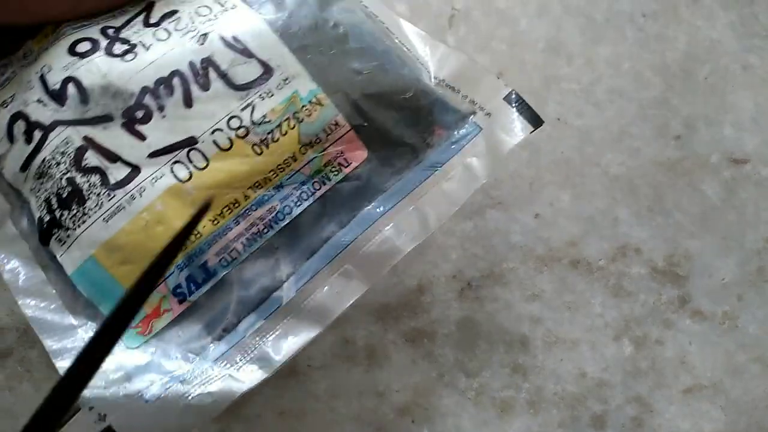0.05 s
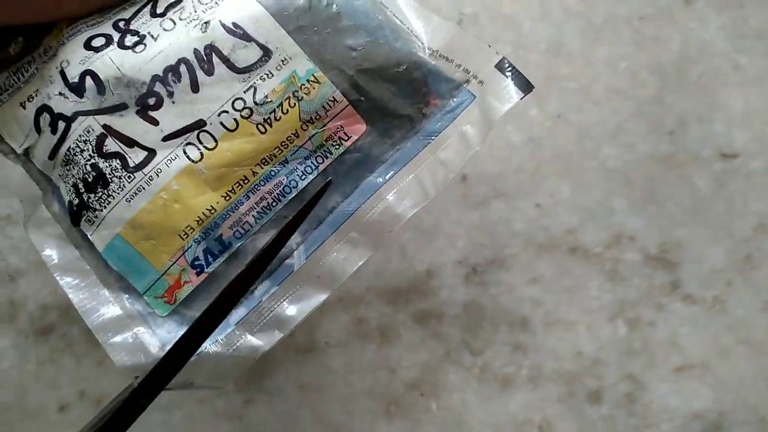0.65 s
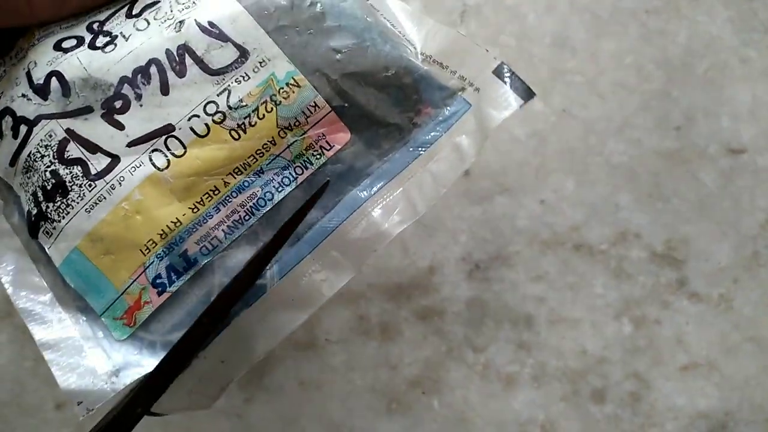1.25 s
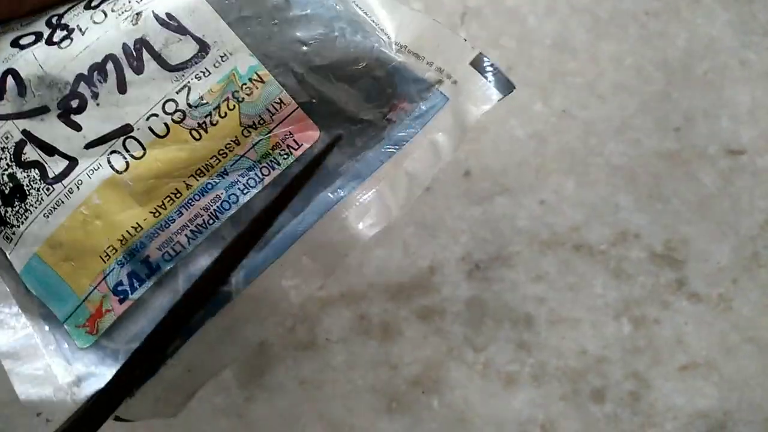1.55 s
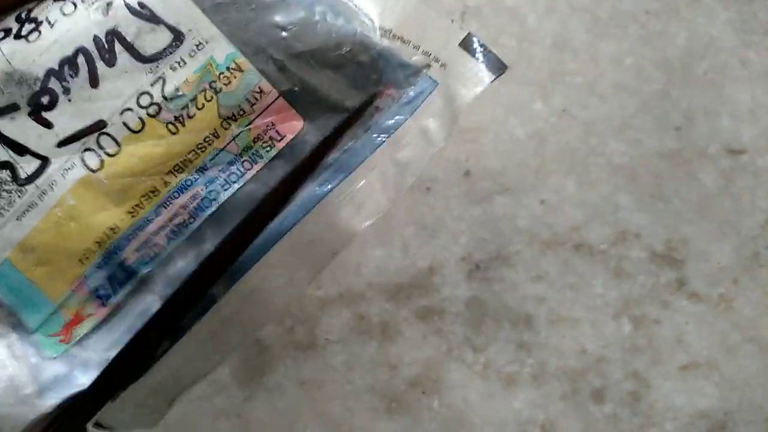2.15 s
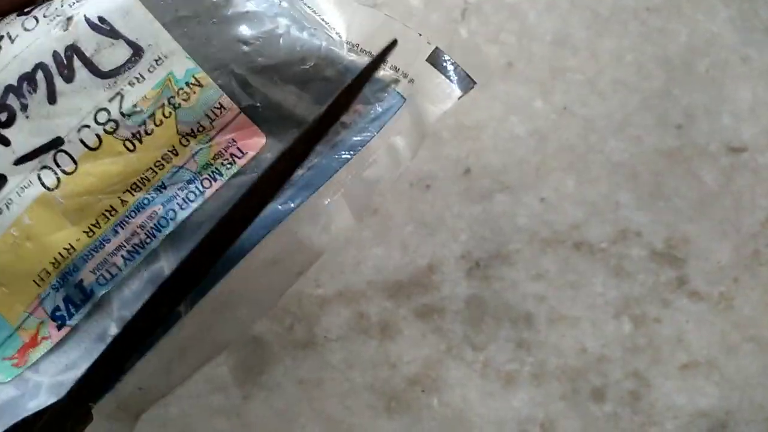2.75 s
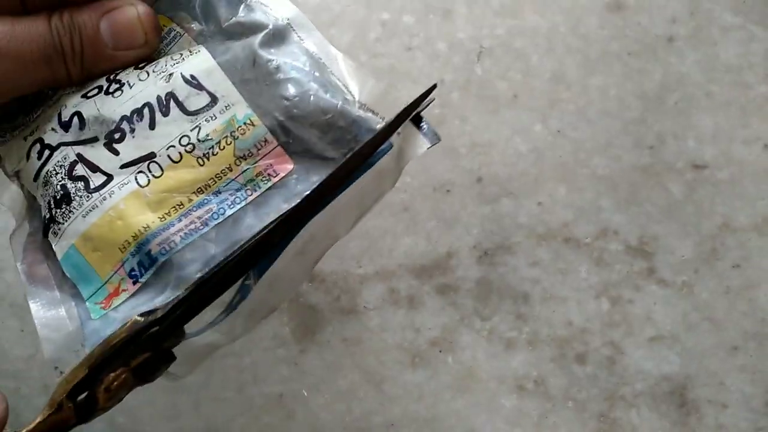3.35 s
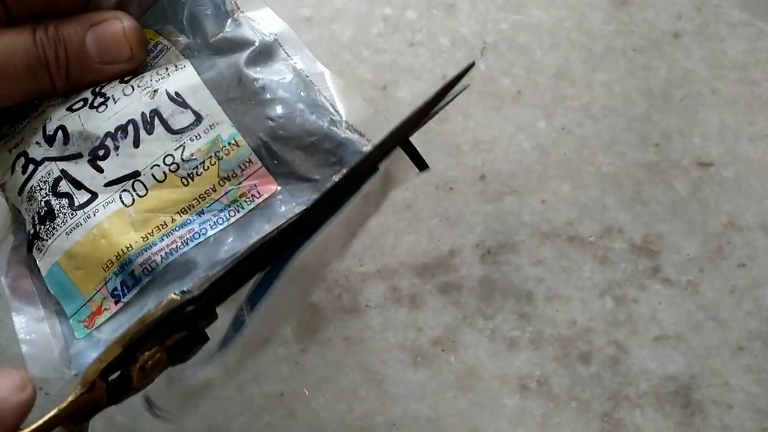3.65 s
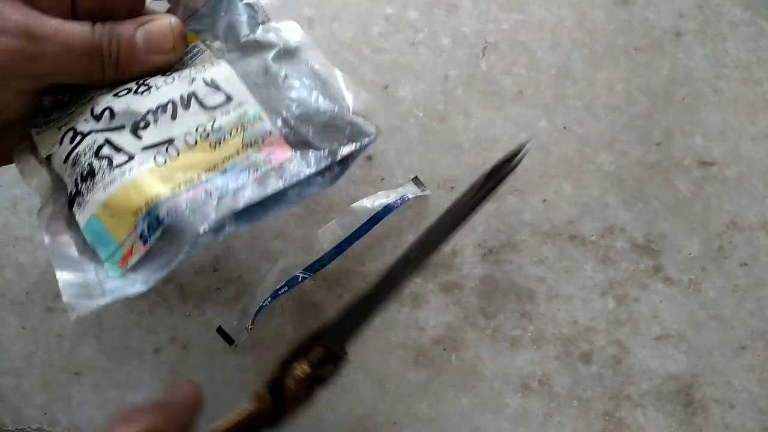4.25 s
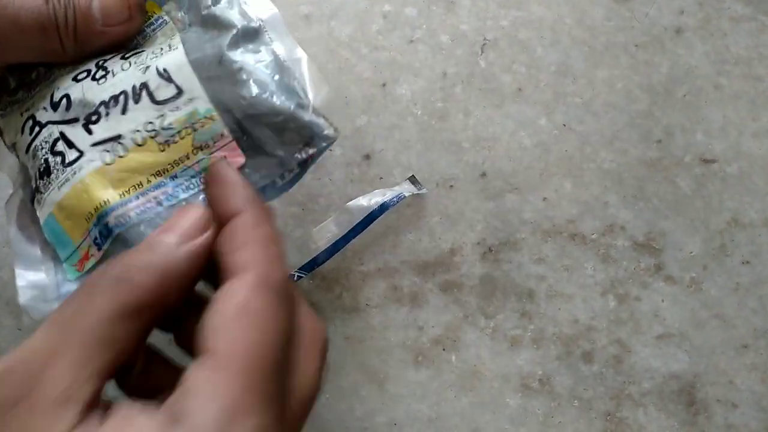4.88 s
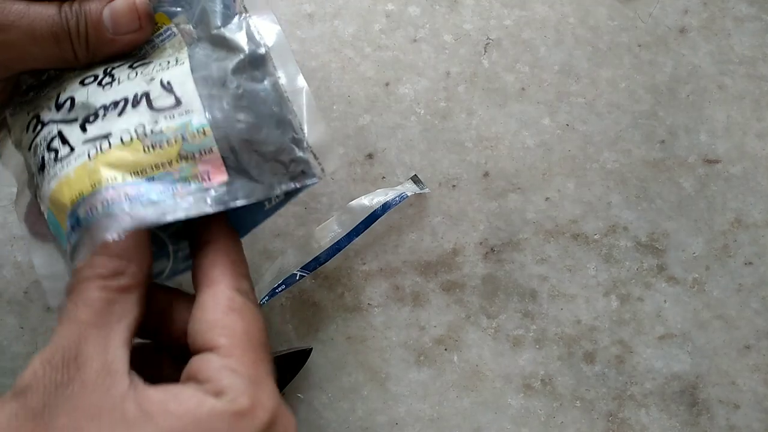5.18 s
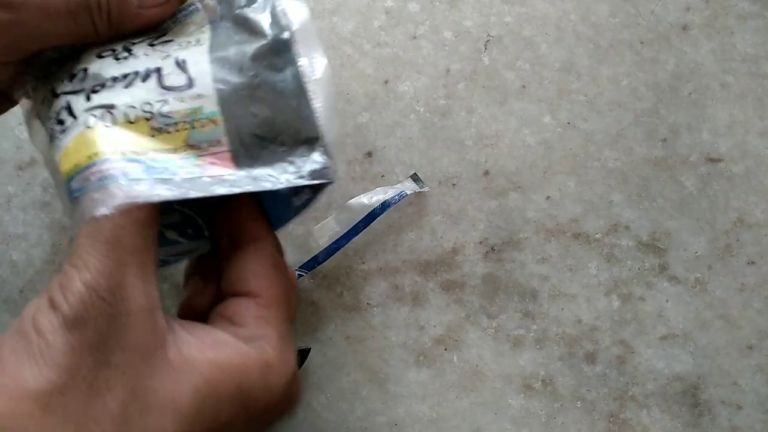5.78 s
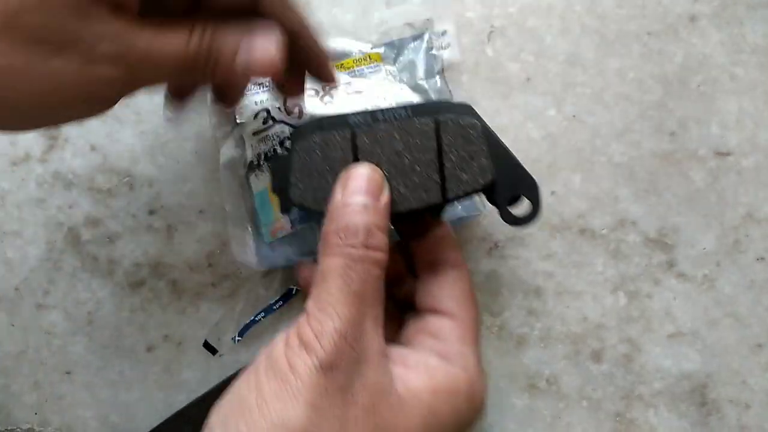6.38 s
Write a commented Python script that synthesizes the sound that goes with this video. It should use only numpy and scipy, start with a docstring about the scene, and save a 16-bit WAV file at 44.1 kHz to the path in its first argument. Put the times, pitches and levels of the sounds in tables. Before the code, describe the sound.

Close by in a small hard room, a stiff plastic packet snaps and crinkles as scissor blades tick against it and shear through in short, raspy strokes. The scissors shut with a click, tap a stone floor, scrape briefly and fall flat with a bright metallic ring. Fingers then dig into the packet and pull out the contents with denser, louder crackling. A faint low rumble lies underneath.

```python
"""Stiff plastic snaps and rustles as scissors cut a packet open, close by.
Creases buckle and crack; the blades tick on the film, shear it in runs of tiny tears, then shut.
The scissors touch a stone floor, scrape along it and fall flat, ringing.
Fingers pull the contents from the crackling packet. A small hard room answers over a low rumble."""
import sys
import numpy as np
from scipy import signal
from scipy.fft import rfft, irfft, next_fast_len
from scipy.io import wavfile
from scipy.ndimage import uniform_filter1d, map_coordinates

SR = 44100
rng = np.random.default_rng(int(sys.argv[2]) if len(sys.argv) > 2 else 0)


def materialize(psi):
    """Save the field psi as 16-bit PCM at rate SR to the path in sys.argv[1].

    A 1-D psi becomes a single channel; in a 2-D psi each row is a channel.
    """
    bounded = np.clip(np.atleast_2d(psi).T, -1, 1)
    quanta = np.round(bounded * 32767).astype(np.int16)
    wavfile.write(sys.argv[1], SR, quanta)


N = 283122
T = np.arange(N) / SR

# spectrum of a buckling crease: freq_hz, gain_db
CREASE_SPECTRUM = [(100, -21.5), (300, -6.5), (550, -6.5), (1000, 1), (1600, -1.5), (2500, -4), (4000, 1.5),
                   (5500, 2), (7500, -4), (10000, -4.5), (14000, -21.5)]
# film sliding under the scissors: time_s, crinkle_db, rub_db
CUTTING_LEVELS = [(0.0, -66.5, -77), (0.14, -66, -60), (0.29, -71.5, -67), (0.52, -78, -67.5),
                  (0.69, -78.5, -97), (1.15, -78, -82), (1.33, -73, -68), (1.55, -67, -75),
                  (1.68, -59, -63), (1.89, -67.5, -69), (2.39, -73, -70.5), (2.5, -65, -67),
                  (2.62, -76, -91), (2.8, -97, -95), (3.04, -69.5, -89.5), (3.48, -71.5, -68),
                  (3.94, -65, -81), (4.35, -72, -70)]
# blades against the film: freq_hz, width_hz, gain_db
BLADE_MODES = [(1100, 120, 15), (2350, 12, 5), (2800, 40, -9), (3460, 210, 6), (5600, 520, 10.5),
               (6370, 200, -9.5), (8260, 220, -30.5), (10130, 560, 0.5), (12500, 300, -22)]
# undamped scissors: freq_hz, width_hz, gain_db
FREE_STEEL_MODES = [(2700, 130, -14.5), (5350, 140, -4.5), (5730, 230, -9.5), (6090, 110, -1.5),
                    (6460, 200, -18), (7700, 120, -17), (8000, 180, -2), (8630, 73, -9), (9070, 140, -5.5),
                    (9920, 120, -3), (10400, 75, -12), (11900, 91, -9.5), (12420, 130, -14),
                    (13000, 200, -13)]


def amp(db):
    """Decibels to gain."""
    return 10 ** (np.asarray(db) / 20)


def unit(x):
    """Scale to rms 1."""
    return x / np.sqrt(np.mean(np.abs(x) ** 2) + 1e-20)


def along(points, hz):
    """Interpolate (freq_hz, value) points on a log axis."""
    freq_hz, values = np.transpose(points)
    return np.interp(np.log(hz + 1), np.log(freq_hz + 1), values)


def curves(rows):
    """One per-sample curve for each column after time_s."""
    time_s, *columns = np.transpose(rows)
    return [np.interp(T, time_s, column) for column in columns]


def wobble(rate_hz, size=N):
    """Smooth random curve with knots at rate_hz."""
    knots = rng.standard_normal(int(size * rate_hz / SR) + 4)
    return map_coordinates(knots, [np.arange(size) * rate_hz / SR])


def filtered(x, response):
    """Apply a complex frequency response."""
    n = x.shape[-1]
    padded = 2 * next_fast_len(n // 2 + 2048)
    return irfft(rfft(x, padded) * response(np.fft.rfftfreq(padded, 1 / SR)), padded)[..., :n]


def causal(db):
    """Minimum-phase response with these gains: no pre-ringing."""
    cepstrum = irfft(db * np.log(10) / 20)
    half = len(cepstrum) // 2
    cepstrum[1:half] *= 2
    cepstrum[half + 1:] = 0
    return np.exp(rfft(cepstrum))


def resonances(modes, hz):
    """Summed response of modes of alternating sign."""
    return sum((-1) ** k * amp(db) * 1j * hz * width_hz / (mode_hz ** 2 - hz ** 2 + 1j * hz * width_hz)
               for k, (mode_hz, width_hz, db) in enumerate(modes))


def stereo_noise(size=N):
    """White noise, alike left and right in the bass, mostly unrelated in the treble."""
    # freq_hz, correlation
    likeness = [(60, 0.99), (130, 0.97), (290, 0.93), (640, 0.71), (1400, -0.37), (3000, -0.3),
                (14000, -0.17)]

    def mid_side_gains(hz):
        angle = np.arccos(np.clip(along(likeness, hz), -1, 1)) / 2
        return np.array([np.cos(angle), np.sin(angle)])
    mid, side = filtered(rng.standard_normal((2, size)), mid_side_gains)
    return np.array([mid + side, mid - side])


def grains(rate_hz, spread_db, life_s, bed):
    """Envelope of tiny uneven slips over a smooth friction bed."""
    strength = amp(spread_db * np.minimum(rng.exponential(size=N), 2.5))
    slips = (rng.random(N) < rate_hz / SR) * strength
    decaying = signal.lfilter([1], [1, -np.exp(-1 / (life_s * SR))], slips)
    return unit(unit(decaying) + bed)


def add(track, sound, start_s, level_db):
    """Mix in a sound with the energy of 10 ms at level_db."""
    start = round(start_s * SR)
    part = sound[:, max(-start, 0):N - start]
    energy = np.sum(sound ** 2) / 2 / (.01 * SR)
    track[:, max(start, 0):][:, :part.shape[1]] += amp(level_db) * part / np.sqrt(energy)


def rumble(level_db, swell_db):
    """Low noise from outside, gently swelling."""
    # freq_hz, gain_db
    spectrum = [(20, -14), (40, -12), (60, -6), (88, 2.5), (105, 3.5), (135, -4.5), (230, -6), (330, -9),
                (430, -17.5), (600, -42.5), (1500, -46.5), (5500, -34.5), (8000, -51.5), (14000, -68)]
    swell = amp(level_db + swell_db * wobble(rate_hz=3.5))
    return swell * unit(filtered(stereo_noise(), lambda hz: amp(along(spectrum, hz))))


def room(x, build_s):
    """Hard walls return a diffuse tail; the bass lasts longest."""
    # freq_hz, t60_s
    decay = [(200, 0.92), (800, 0.24), (2100, 0.35), (5500, 0.17), (9000, 0.19), (14000, 0.2)]
    hz, t, bins = signal.stft(stereo_noise(SR // 2), SR, nperseg=256)
    tail = signal.istft(bins * amp(-60 * t / along(decay, hz)[:, None]), SR, nperseg=256)[1]
    tail *= 1 - np.exp(-np.arange(tail.shape[1]) / SR / build_s)
    return signal.fftconvolve(x, tail / np.linalg.norm(tail[0]), axes=1)[:, :N]


def impacts(contacts, modes, crack_db, push):
    """A clean push plus rough chatter rings the object; each contact also gives a dry crack."""
    # steel on something hard: freq_hz, gain_db
    crack_spectrum = [(150, -14), (500, -13), (1000, -9.5), (2400, -7), (5000, -1), (10000, -6),
                      (14000, -18.5)]
    out, t = np.zeros((2, N)), np.arange(SR // 8) / SR
    bite = 1 - np.exp(-t / .0012)  # edges engage
    for start_s, level_db, t60_s in contacts:
        chatter, grit = (stereo_noise(len(t)) * bite * amp(-60 * t / t60_s) for _ in range(2))
        force = chatter / np.linalg.norm(chatter) + push * (t == 0)
        ring = unit(filtered(force, lambda hz: resonances(modes, hz)))
        crack = unit(filtered(grit, lambda hz: causal(along(crack_spectrum, hz))))
        add(out, ring + amp(crack_db) * crack, start_s, level_db)
    return out


def blade_ticks(t60_s):
    """The blades tick on the film as they are lined up."""
    # start_s, level_db
    ticks = [(.19, -58), (.243, -55.5), (.279, -60), (.327, -60), (1.201, -63.5), (1.975, -61.5),
             (2.105, -64.5), (2.1365, -46), (3.205, -72), (3.494, -55.5)]
    return impacts([(*tick, t60_s) for tick in ticks], BLADE_MODES, crack_db=-24.5, push=.26)


def packet_bumps(t60_s):
    """Scissors and fingers knock the filled packet."""
    # start_s, level_db
    bumps = [(.0535, -30.5), (.15, -44), (.551, -41.5), (.6315, -56.5), (1.812, -51.5), (3.353, -46.5),
             (3.41, -49), (3.924, -44), (4.346, -52.5), (4.414, -48.5), (5.847, -44.5), (6.2195, -54)]
    # freq_hz, width_hz, gain_db
    contents_modes = [(706, 167, -8), (1133, 167, 3.5), (1262, 700, -8), (2340, 72, -9.5)]
    return impacts([(*bump, t60_s) for bump in bumps], contents_modes, crack_db=-8, push=.77)


def handles_shut():
    """The handles meet as the cut ends."""
    # start_s, level_db, t60_s
    contacts = [(4.136, -36, 0.029)]
    # freq_hz, width_hz, gain_db
    handle_modes = [(428, 66, -11), (748, 56, -10.5), (1226, 130, -15.5), (2076, 79, -27), (2520, 270, -21),
                    (3160, 1500, -27.5), (8190, 180, -17)]
    return impacts(contacts, handle_modes, crack_db=-8.5, push=.57)


def scissors_on_floor(crack_db, push):
    """Steel touches stone, damped by the hand, then falls flat and chatters."""
    # start_s, level_db, t60_s
    touches = [(4.3745, -24.5, 0.0014), (4.3768, -21, 0.0095), (4.594, -44, .006)]
    falls = [(4.7062, -21, 0.022), (4.7112, -24.5, 0.043), (4.7175, -40, 0.071), (4.724, -33.5, 0.28)]
    # freq_hz, width_hz, gain_db
    held_modes = [(2470, 270, -21), (3900, 320, -6), (4120, 200, -7), (5090, 250, -25.5), (6400, 260, -2.5),
                  (7000, 180, -19), (7450, 130, 1.5), (8600, 220, 4.5), (10140, 170, 4), (12770, 300, -19),
                  (13050, 280, -24)]
    return impacts(touches, held_modes, crack_db, push) + impacts(falls, FREE_STEEL_MODES, crack_db, push)


def floor_scrape(ring_db, rasp_db):
    """A blade drags over gritty stone and rings."""
    # time_s, level_db
    drag = [(4.44, -60), (4.522, -61), (4.542, -44.5), (4.7, -39.5), (4.725, -70)]
    # freq_hz, gain_db
    spectrum = [(500, -15), (1500, -16.5), (2400, -8), (3800, -5.5), (5600, -1.5), (7200, -14),
                (10000, -6.5), (14000, -23)]
    grit = grains(rate_hz=600, spread_db=6, life_s=.0005, bed=.9)
    ring = unit(filtered(rng.standard_normal((2, N)) * grit, lambda hz: resonances(FREE_STEEL_MODES, hz)))
    rasp = unit(filtered(rng.standard_normal((2, N)) * grit, lambda hz: amp(along(spectrum, hz))))
    moving = (T > drag[0][0]) & (T < drag[-1][0])
    return moving * amp(curves(drag)[0]) * (amp(ring_db) * ring + amp(rasp_db) * rasp)


def blade_friction(gain_db):
    """Rubbing on the film keeps the blades ringing faintly."""
    _, rub_db = curves(CUTTING_LEVELS)
    ring = unit(filtered(stereo_noise(), lambda hz: resonances(BLADE_MODES, hz) / (1 + (hz / 4000) ** 4)))
    return (T < CUTTING_LEVELS[-1][0]) * amp(rub_db + gain_db) * ring


def through_packet(force, spectra, ring):
    """Sound shaped by the spectra leaves the film directly and through the packet's resonances."""
    # taut packet and contents: freq_hz, width_hz, gain_db
    modes = [(751, 180, 7), (1110, 150, 6), (1304, 160, -23), (1976, 49, 7), (2243, 210, 2.5),
             (2780, 63, 6), (3640, 540, -14), (5570, 660, 2)]

    def response(hz):
        colour = causal(sum(along(spectrum, hz) for spectrum in spectra))
        return colour * (1 + ring * sum(resonances([mode], hz) for mode in modes))
    return filtered(force, response)


def flexing(x, depth_db):
    """Bending film shifts its resonances: random patches of gain over pitch and time."""
    bins = signal.stft(x, nperseg=512)[2]
    patches = uniform_filter1d(rng.standard_normal(bins.shape[1:]), size=4, axis=0)
    patches = uniform_filter1d(patches, size=12, axis=1)
    return signal.istft(bins * amp(depth_db * unit(patches)), nperseg=512)[1][:, :N]


def rustle(ring, rub_gain_db, crinkle_gain_db, hiss_gain_db, jostle_gain_db):
    """Blades, later fingers, slide on the film and trip small creases; fingers also jostle the packet."""
    # time_s, crinkle_db, rub_db
    unpacking_levels = [(4.9, -59.5, -67), (5.022, -62.5, -69.5), (5.258, -59, -60), (5.5, -58.5, -68.5),
                        (5.632, -60, -63), (5.902, -56, -54), (6.118, -68, -67), (6.42, -62.5, -63)]
    # spectra: freq_hz, gain_db
    rub = [(300, -27), (520, -3), (730, 3), (930, 3), (1130, -3.5), (1380, 8), (1700, -1), (2800, -53.5)]
    crinkle = [(1100, -26), (1650, -8.5), (2300, 0), (3300, 2.5), (4300, -1.5), (5700, 1.5), (7000, -10),
               (9500, -17.5)]
    hiss = [(4500, -30.5), (7000, 1), (9500, 4), (11500, -5), (14000, -23)]
    jostle = [(60, -26), (150, 6.5), (280, -1), (450, -5.5), (800, -22), (1600, -26)]
    firm_crinkle_db, hiss_slope = -65, 1.1
    crinkle_db, rub_db = curves(list(CUTTING_LEVELS) + list(unpacking_levels))
    hiss_db = firm_crinkle_db + hiss_slope * (crinkle_db - firm_crinkle_db)
    cutting, unpacking = T < CUTTING_LEVELS[-1][0], T > unpacking_levels[0][0]
    slips = grains(rate_hz=220, spread_db=7, life_s=.0009, bed=.75)

    def layer(spectrum, db):
        return amp(db) * unit(through_packet(stereo_noise() * slips, [spectrum], ring))
    film = layer(rub, rub_db + rub_gain_db)
    film += layer(crinkle, crinkle_db + crinkle_gain_db)
    film += layer(hiss, hiss_db + hiss_gain_db)
    return (cutting | unpacking) * film + unpacking * layer(jostle, rub_db + jostle_gain_db)


def crumple(ring, rise_db_per_s, fall_db_per_s):
    """Each squeeze crumples many creases at once: a dense crackle swells and lets go."""
    # peak_s, level_db
    squeezes = [(1.525, -52), (2.43, -45.5), (3.54, -53.5), (5.125, -54), (5.425, -42.5), (5.61, -41.5),
                (5.953, -37.5), (6.04, -56.5)]
    small_facets = [(300, -6), (900, 1), (2400, 8.5), (5300, -.5), (9500, -1)]  # freq_hz, gain_db
    crackle = stereo_noise() * grains(rate_hz=500, spread_db=3.5, life_s=.0012, bed=1)
    force = sum(amp(level_db - np.maximum(rise_db_per_s * (peak_s - T), fall_db_per_s * (T - peak_s)))
                for peak_s, level_db in squeezes)
    return force * unit(through_packet(crackle, [CREASE_SPECTRUM, small_facets], ring))


def shear(edge_s, ring):
    """Each stroke parts the film in a fast run of tiny tears; lighter strokes are mostly treble."""
    # start_s, end_s, level_db
    strokes = [(1.097, 1.133, -65), (1.229, 1.253, -60), (1.262, 1.321, -56), (1.506, 1.544, -48.5),
               (1.75, 1.787, -52), (2.239, 2.269, -55.5), (2.4, 2.456, -53.5), (3.058, 3.126, -61),
               (3.228, 3.263, -56), (3.336, 3.385, -57), (3.513, 3.586, -51), (3.613, 3.643, -59),
               (3.662, 3.714, -57), (3.81, 3.816, -55), (3.999, 4.04, -60.5), (4.095, 4.124, -61)]
    # freq_hz, gain_db
    spectrum = [(300, -30), (700, 3.5), (1500, -2), (2500, 1), (4000, 6.5), (5600, 0.5), (7500, -1),
                (10000, -1), (14000, -16.5)]
    even_stroke_db, treble_slope, treble_hz = -50.5, .92, 7000
    tears = stereo_noise() * grains(rate_hz=700, spread_db=5, life_s=.0004, bed=.6)
    rasp = unit(through_packet(tears, [spectrum], ring))
    treble = filtered(rasp, lambda hz: 1 / (1 + (treble_hz / (hz + 1)) ** 8))
    out = np.zeros((2, N))
    for start_s, end_s, level_db in strokes:
        bright_db = treble_slope * (even_stroke_db - level_db)
        force = np.clip(np.minimum(T - start_s, end_s - T) / edge_s / 2 + .5, 0, 1)
        out += amp(level_db) * force * (rasp + (amp(bright_db) - 1) * treble)
    return out


def snaps(ragged_db, crack_gain, crack_t60_s, ripple_db, ring):
    """A crease creeps, gives way with a crack, and the sheet flutters to rest."""
    # time_s, level_db, body_db, bright_db, rise_t60_s, decay_t60_s
    creases = [(0.0537, -28, -4, -3.5, .003, 0.017), (0.4792, -47.5, 9.5, -33, 0.043, 0.068),
               (0.5527, -37, -0.5, -1, 0.013, 0.011), (0.6308, -46.5, 15.5, -3, 0.0038, 0.021),
               (0.8497, -37, -3, 3, 0.013, 0.042), (.86, -30.5, -2.5, 2.5, 0.0065, 0.013),
               (0.9203, -47.5, -1.5, 10, 0.0057, .046), (1.2804, -32.5, -10.5, 9, 0.02, 0.0093),
               (1.485, -45.5, -10, 10, .008, .007), (1.496, -44, -1, 5, 0.0097, 0.0073),
               (1.5491, -41, -10, -1, 0.02, .013), (1.643, -46.5, 5, 12, 0.0074, 0.072),
               (1.6825, -48, -1, 14, 0.0072, 0.017), (1.7058, -38.5, 7, 1, 0.025, .023),
               (1.7239, -36.5, 2.5, -9, 0.0061, 0.019), (1.8368, -42.5, -8, 4, 0.0028, .01),
               (1.8486, -41.5, 3.5, 4, 0.022, 0.078), (2.0402, -27.5, -8, 4.5, 0.03, 0.022),
               (2.1251, -42.5, 3, -19, 0.0045, 0.0077), (2.1378, -37.5, 1, -13, 0.016, 0.0035),
               (2.22, -44, -5, 9, 0.059, 0.044), (2.3523, -41, -10.5, 4.5, 0.0022, 0.011),
               (2.398, -33.5, -19, 7.5, .008, .009), (2.4144, -39.5, 5, 4, .005, 0.052),
               (2.552, -45, 0.5, 4, 0.011, 0.3), (2.8073, -56, -16.5, -3, .006, 0.14),
               (2.873, -50.5, -27.5, 19, 0.0032, 0.0034), (3.659, -45.5, -2, 22, .014, 0.046),
               (4.1983, -45, -1.5, 5.5, .005, 0.027), (4.9885, -44.5, 5, 0, .023, 0.024),
               (5.1152, -37, 14.5, -3, 0.018, .045), (5.1516, -43, 3, -1, 0.011, .011),
               (5.1615, -39.5, 14, -4, 0.016, 0.032), (5.3106, -42, -3, -3, .011, 0.29),
               (5.352, -36, -7.5, -20, .002, 0.011), (5.36, -33.5, -22, -1.5, 0.008, 0.0055),
               (5.403, -30, -10.5, -5, 0.019, 0.046), (5.5734, -26.5, -1, -3.5, 0.0093, 0.025),
               (5.5905, -29.5, -3, 0, .006, 0.038), (5.6484, -32, 0.5, -0.5, .002, 0.017),
               (5.9444, -29, -5.5, 0, 0.052, 0.057), (5.9765, -30, 1, -0.5, 0.028, 0.015),
               (6.2693, -40, 9.5, -11.5, 0.0051, 0.037), (6.3487, -45, 0, -6.5, 0.027, 0.0084)]
    out, lead = np.zeros((2, N)), SR // 40
    t = np.arange(-lead, SR // 12) / SR
    creep = amp(-27 + 60 * t / .02) * (t < 0)
    crack = crack_gain * amp(-60 * np.abs(t) / crack_t60_s)
    for time_s, level_db, body_db, bright_db, rise_t60_s, decay_t60_s in creases:
        flutter = amp(-60 * np.where(t < 0, -t / rise_t60_s, t / decay_t60_s)) * (t > -rise_t60_s / 3.6)
        flutter *= amp(ragged_db * np.clip(wobble(rate_hz=1366.6, size=len(t)), -2, 2))
        # large facets sound dull, small ones bright; each has its own pitches
        facet = [(250, .96), (900, body_db), (2400, 2 + .69 * body_db), (5300, 0), (9500, bright_db)]
        pitches = np.column_stack([np.geomspace(400, 15000, 60), rng.uniform(-ripple_db, ripple_db, 60)])
        force = stereo_noise(len(t)) * (creep + crack + flutter)
        snap = through_packet(force, [CREASE_SPECTRUM, facet, pitches], ring)
        add(out, snap, time_s - lead / SR - .0004, level_db)
    return out


def scene():
    """Packet and scissors in the room, over the rumble."""
    film = snaps(ragged_db=3, crack_gain=.9, crack_t60_s=.0013, ripple_db=4, ring=.5)
    knocks = blade_ticks(t60_s=.014) + packet_bumps(t60_s=.008) + handles_shut()
    knocks += scissors_on_floor(crack_db=-5, push=.25)
    friction = rustle(ring=.64, rub_gain_db=1, crinkle_gain_db=-.5, hiss_gain_db=-10.5, jostle_gain_db=-3)
    friction += blade_friction(gain_db=-5.5) + floor_scrape(ring_db=-6, rasp_db=-5)
    friction += crumple(ring=.35, rise_db_per_s=380.5, fall_db_per_s=298)
    friction += shear(edge_s=.0091, ring=.97)
    friction = flexing(friction, depth_db=4)
    echo = room(amp(-10) * (film + friction) + amp(-10.5) * knocks, build_s=.0011)
    return film + knocks + friction + echo + rumble(level_db=-59, swell_db=.5)


def record(dry):
    """Two microphone ports, each with its own colour, then a steep low-pass."""
    # freq_hz, gain_db
    left_port = [(100, 1), (500, 1.5), (1200, -3), (2400, 4.5), (4000, 3), (5300, 5), (6300, 6.5),
                 (7500, 2), (9500, -14), (11000, -10), (12500, -5.5), (14000, -15.5)]
    right_port = [(100, 0), (500, 0.8), (1200, -3.5), (2400, 0.9), (4000, -3), (5300, -9.5), (6300, -0.5),
                  (7500, -0.5), (9500, 4), (11000, 2.5), (12500, 2), (14000, 2.5)]
    cutoff_hz = 14300
    ports = filtered(dry, lambda hz: np.array([causal(along(p, hz)) for p in (left_port, right_port)]))
    return filtered(ports, lambda hz: 1 / np.sqrt(1 + (hz / cutoff_hz) ** 90))


dry = scene()
out = record(dry)
materialize(out)
```